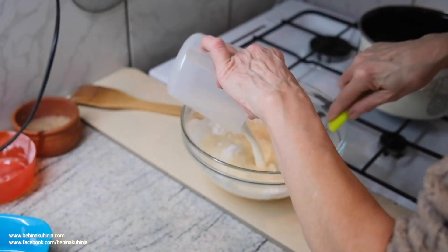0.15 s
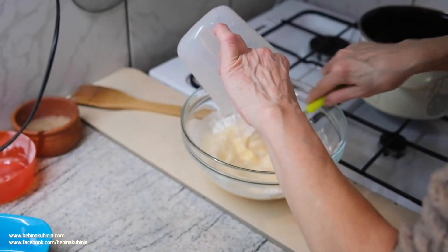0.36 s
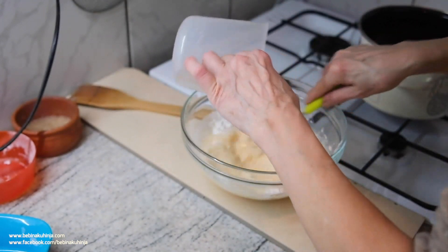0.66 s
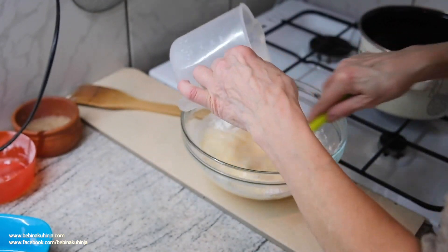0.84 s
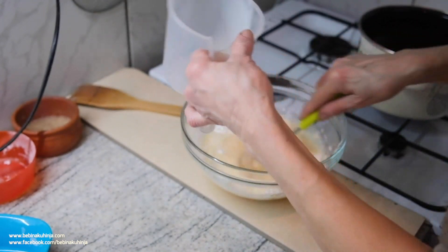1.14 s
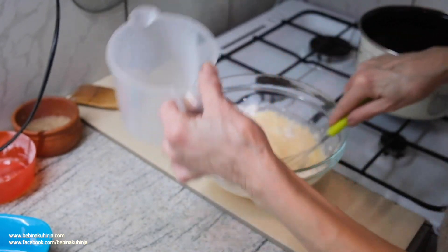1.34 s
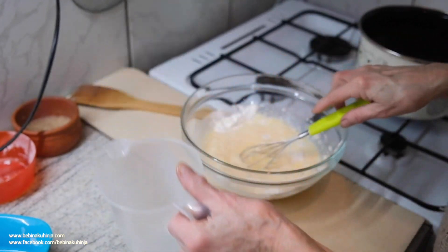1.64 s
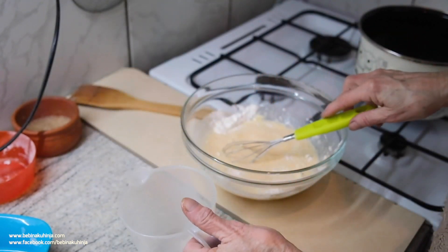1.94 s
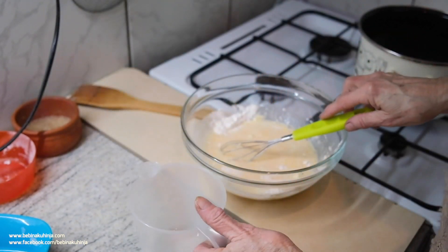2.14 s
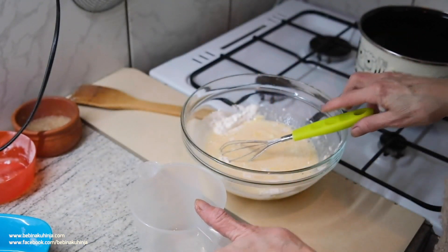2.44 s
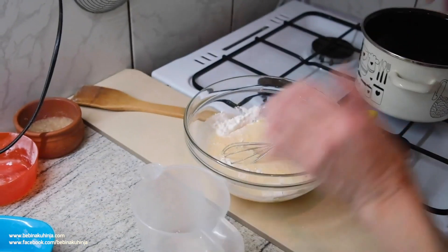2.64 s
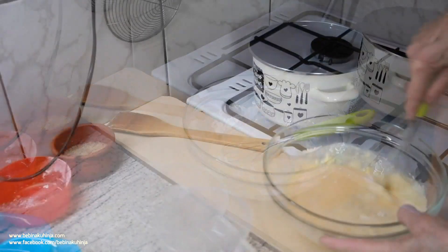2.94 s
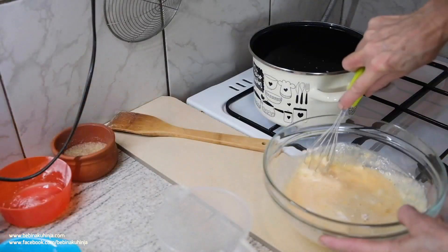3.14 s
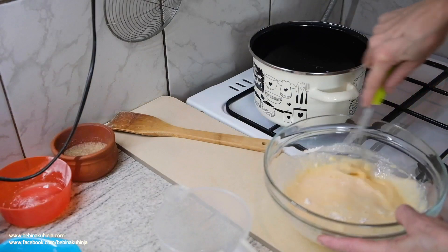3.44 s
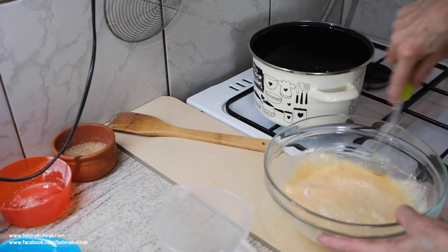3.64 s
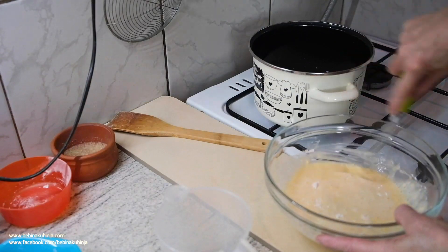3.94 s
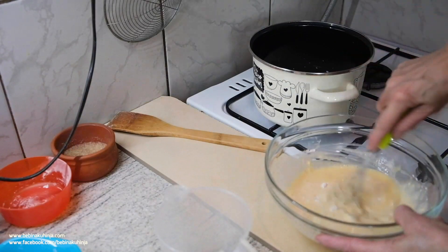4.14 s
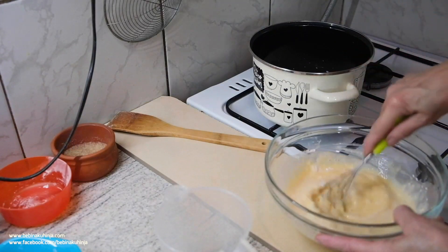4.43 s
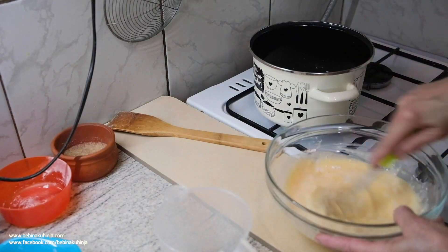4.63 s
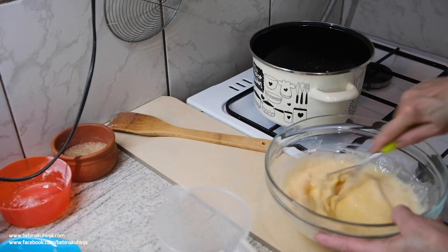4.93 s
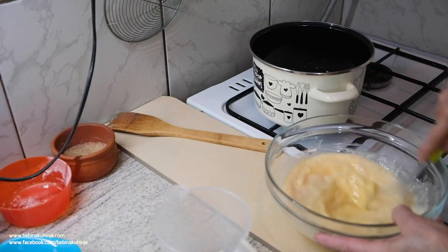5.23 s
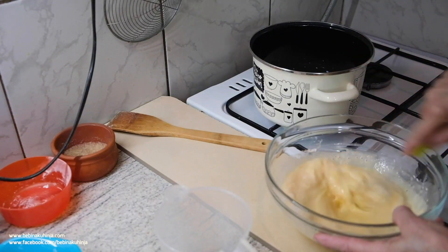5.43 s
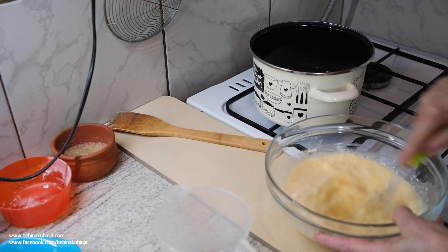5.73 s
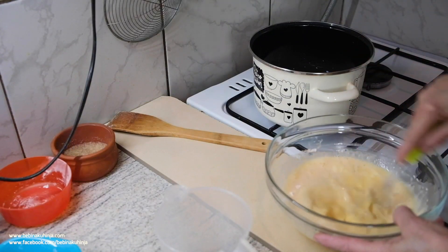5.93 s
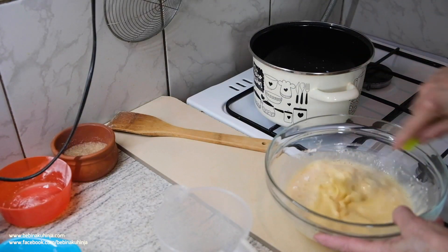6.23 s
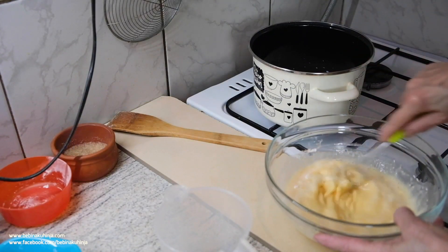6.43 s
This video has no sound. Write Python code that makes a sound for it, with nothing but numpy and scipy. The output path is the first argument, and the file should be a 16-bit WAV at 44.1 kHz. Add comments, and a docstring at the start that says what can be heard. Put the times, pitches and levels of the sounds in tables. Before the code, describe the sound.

A wire whisk ticks unevenly against a glass bowl of sticky batter. Around two seconds in, a plastic jug clinks the rim and is set down with a few hollow knocks. The whisking then speeds into a steady beat of scrapes, ticks and faint squelches, the bowl thudding on a wooden board. The small kitchen has a low hum and hiss, and puffs of air rumble on the close microphone.

```python
"""Whisking batter in a glass bowl

A wire whisk ticks and scrapes through sticky batter in a small kitchen; a plastic jug touches the
glass and is set down. As the beating speeds up, the bowl thuds on its wooden board. Under it sit a low
hum and a hiss, and air stirred by the arms buffets the two microphone ports, the left one most."""
import sys
import numpy as np
from scipy import signal
from scipy.fft import rfft, irfft, next_fast_len
from scipy.io import wavfile
from scipy.ndimage import uniform_filter1d, map_coordinates

SR = 44100
rng = np.random.default_rng(int(sys.argv[2]) if len(sys.argv) > 2 else 0)


def wav_out(sig):
    """Save sig, one row per channel (or a flat mono array), as 16-bit PCM at SR to the path in sys.argv[1]."""
    wavfile.write(sys.argv[1], SR, np.round(np.clip(np.atleast_2d(sig).T, -1, 1) * 32767).astype(np.int16))


N = 289957
T = np.arange(N) / SR

# How hard the whisk works. Each row: time in seconds, effort in dB.
EFFORT = [(0, -4.5), (.1, 3.5), (.45, -0.5), (1.3, -1), (1.6, -6.5), (2.7, -8), (3, -0.5), (4.1, 3.5),
          (4.5, 8.5), (5.5, 12.5), (6.57, 10)]
# The fader ride on the stirred air. Each row: time in seconds, level in dB.
DRAUGHT_RIDE = [(0, -14.5), (.5, -28), (1.0, -26), (1.34, -14), (1.65, -26), (1.85, -17), (2.1, -14.5),
                (2.5, -25), (2.8, -19), (3.6, -22), (4.6, -13.5), (5.3, -17), (5.7, -13.5), (6.25, -13),
                (6.45, -28.5), (6.57, -22)]
# Strong puffs of air. Each row: centre in seconds, peak at the left port in dB.
EDDIES = [(0.141, -20), (0.459, -12), (0.746, -10.5), (1.317, -8.5), (1.41, -11.5), (2.126, -6),
          (3.378, -8.5), (3.966, -11.5), (4.234, -12), (4.32, -5), (4.457, -11.5), (4.604, -6),
          (4.814, -14.5), (4.94, -15), (5.09, -6.5), (5.471, 1.5), (5.914, -6), (6.11, -0.5), (6.161, -16),
          (6.294, -7)]
# EQ curves for the noise layers. Each row: frequency in Hz, level in dB.
AIR_EQ = [(1.8, -66), (3.0, -2), (16, 7), (27, -6), (41, -13.5), (82, -25.5), (122, -36.5), (151, -38),
          (200, -42), (260, -78), (440, -120)]
MURMUR_EQ = [(82, -21), (140, -3), (183, -16), (259, -3.5), (345, -10), (567, -15.5), (699, -17.5),
             (904, -10), (1150, -29.5), (1500, -50), (1950, -32), (3300, -120)]
SHUDDER_EQ = [(150, -29), (200, -12), (270, -8), (370, -5.5), (500, -8.5), (650, -16), (900, -12.5),
              (1200, -15.5), (2000, -17), (3300, -120)]
QUIET_HISS_EQ = [(590, -39), (1000, -3), (1650, 2), (1830, 6), (3170, -3.5), (6250, 3.5), (7440, 0.5),
                 (11900, 4.5), (15200, -12), (16300, -13)]
BUSY_HISS_EQ = [(590, -43), (1000, 0), (1590, 4.5), (1940, 8), (2600, -13), (3300, 0), (4200, -3),
                (4720, 4.5), (5490, 2.5), (10700, -3), (14500, -3), (16300, -48)]
WIRE_EQ = [(290, -82), (500, 7), (752, 16), (992, 6.5), (1490, 6), (2240, -3.5), (2750, -1), (3320, 0),
           (5950, 0.5), (12700, -4.5), (15100, -16), (16300, -31)]
# Ridges in the busy hiss. Each row: centre in Hz, width in Hz, lift in dB.
HISS_RIDGES = [(1260, 80, 4.5), (1868, 42, 9), (2037, 34, 10.5), (4640, 220, 6.5), (6960, 210, 12),
               (9300, 720, 8.5), (10800, 540, 9), (14700, 400, 0)]
# Wire hits glass. Each row: start in seconds, level in dB, pitch in Hz, crack against ring in dB.
WIRE_TICKS = [(0.0114, -31.5, 4470, 8), (0.047, -29, 3130, 6), (0.066, -24, 4900, 1),
              (0.0838, -3.5, 5320, -15), (0.0977, -14, 5700, -9), (0.107, -11, 4600, -23),
              (0.1126, -15.5, 5810, -6), (0.119, -3.5, 5330, -15.5), (0.229, -23, 5160, -5.5),
              (0.286, -29, 5500, 0), (0.303, -19, 4840, 0), (0.349, -30, 4870, -8), (0.377, -30, 5140, -2),
              (0.386, -27, 9250, 2), (0.4, -31, 5500, -7), (0.42, -33, 2260, -2), (0.452, -24.5, 5460, -11),
              (0.498, -32.5, 9150, 2.5), (0.6374, -15.5, 6100, -4), (0.6637, -29.5, 6260, 8.5),
              (0.93, -23.5, 1910, -25), (0.93, -21, 4670, -4), (0.9684, -27.5, 3930, 2.5),
              (1.015, -20.5, 4770, -1.5), (1.082, -38.5, 2210, 8), (1.216, -28, 6000, -5),
              (1.2152, -38, 2000, 8), (1.2437, -26, 2240, 3), (1.803, -10.5, 3430, -11),
              (1.864, -27.5, 5800, 1), (1.993, -10, 4750, -34), (1.996, -12.5, 2200, -3),
              (2.039, -22.5, 2330, 2), (2.04, -17, 4800, -27), (2.0578, -27.5, 2170, 5),
              (2.2232, -24.5, 3630, -3), (2.663, -39, 1980, 4), (3.1031, -29.5, 2150, 1),
              (3.128, -19, 7650, 2.5), (3.43, -24.5, 2630, -21), (3.5538, -32, 1970, 7),
              (3.597, -36, 2040, 9), (3.63, -30, 3320, 16.5), (3.9933, -14, 4470, -1.5),
              (4.077, -26.5, 2720, 3), (4.148, -15, 5370, -3.5), (4.1935, -25.5, 2640, 0),
              (4.21, -30, 2720, -10), (4.2233, -23.5, 2910, 2), (4.452, -29, 3940, -12),
              (4.4866, -15.5, 4000, -17), (4.5662, -16, 6000, 0), (4.568, -23.5, 3930, 0),
              (4.635, -20.5, 5230, -3), (4.7175, -29, 1690, 1), (4.7771, -20.5, 4460, 0),
              (4.786, -26.5, 2980, 4), (4.854, -33, 3150, 0), (4.8884, -22.5, 3280, 8),
              (4.906, -21, 5300, -3), (4.924, -20, 5470, -12), (4.966, -13.5, 6970, -4),
              (4.968, -23.5, 3030, -3), (5.035, -24.5, 4070, 3.5), (5.104, -30.5, 3980, -13),
              (5.181, -25.5, 2890, 8.5), (5.183, -21, 5060, 6), (5.208, -21, 4400, -17),
              (5.246, -24, 4070, 0), (5.36, -24, 3880, -12), (5.386, -26.5, 4140, 4),
              (5.413, -17, 7200, -4), (5.434, -14, 5460, -7), (5.5511, -20.5, 2756, 2),
              (5.601, -16.5, 5100, -3.5), (5.639, -31, 4630, -12), (5.651, -16, 10000, -12),
              (5.687, -17.5, 2800, 2.5), (5.6875, -15, 5300, -15), (5.696, -13, 5560, -8),
              (5.716, -23, 3870, 2), (5.758, -11, 4670, -2), (5.855, -15, 4750, 5),
              (5.889, -11.5, 5320, 0.5), (5.927, -20, 3940, 3.5), (6.008, -13.5, 3130, -1),
              (6.02, -20, 4280, -10), (6.046, -20, 3180, 6), (6.0924, -28, 2920, 3),
              (6.119, -23.5, 7500, 5), (6.153, -18, 7800, 0), (6.154, -23.5, 2800, -6),
              (6.23, -32, 1850, 13), (6.296, -13.5, 3180, 1), (6.307, -26, 4400, -13),
              (6.325, -19, 5700, -14), (6.33, -10.5, 5600, -9), (6.3928, -23, 3550, -1),
              (6.4384, -25, 7100, 5), (6.4979, -14, 4570, 2.5), (6.504, -22, 1880, -15),
              (6.524, -23, 8400, 3.5)]
# Bowl or jug jolts the board outside the fast beats. Each row: start in seconds, level in dB.
JOLTS = [(0.045, -35.5), (0.665, -50.5), (1.243, -43.5), (1.801, -36.5), (1.841, -38.5), (1.992, -24),
         (2.037, -49), (2.058, -27), (2.15, -32.5), (2.222, -26.5), (2.834, -37)]
# The fast beats. Each row: thud time in seconds, levels in dB of thud, sweep in and sweep back,
# then the back sweep's delay in seconds, extra treble in dB and half length in seconds.
BEATS = [(3.293, -29.5, -62, -50, 0.13, -8, 0.022), (3.665, -37.5, -63, -58, 0.076, -15, 0.017),
         (3.882, -25, -58, -69, 0.11, 0, .014), (4.287, -29.5, -53, -44, 0.11, -5, 0.013),
         (4.508, -25, -40.5, -38, 0.13, -5, 0.011), (4.745, -22, -41.5, -37, .12, -3, 0.013),
         (4.977, -21.5, -40, -47.5, .1, 5, 0.023), (5.217, -23, -39, -57, 0.1, 7, 0.048),
         (5.441, -21.5, -39.5, -37, 0.11, -9, 0.019), (5.662, -22.5, -33.5, -38.5, 0.09, -1, 0.02),
         (5.863, -25.5, -35, -34, 0.079, -2, 0.012), (6.078, -41, -54, -42.5, 0.056, 3, 0.023),
         (6.266, -23.5, -38.5, -40, 0.079, -6, 0.016), (6.471, -23, -36, -45, 0.087, -9, 0.023)]
# Modes of the board and of the vessel's air. Each row: pitch in Hz, level in dB, t60 in seconds.
BOARD_MODES = [(118.7, -11.5, 0.55), (271.6, -9, 0.17), (330.5, 2, 0.028), (347, 7.5, 0.034),
               (405.3, -9.5, 0.24), (785, -1, 0.062), (1420, 9.5, 0.0064)]
HOLLOW_MODES = [(710, -10, 0.44), (868, -7.5, 0.14)]
# Knocks on bowl or jug. Each row: start in seconds, level in dB, pitch in Hz, hollow ring in dB.
DULL_TAPS = [(0.08, -38, 850, 7), (0.235, -46.5, 860, -12), (0.301, -39.5, 883, -22),
             (0.665, -36.5, 866, 7), (0.931, -42.5, 820, -20), (1.017, -41.5, 875, -6),
             (1.243, -41, 533, -16), (1.994, -17.5, 762, -19), (2.039, -21.5, 777, 5),
             (2.058, -30.5, 780, 12), (2.073, -37, 850, 11), (2.135, -53, 860, 18), (2.166, -41.5, 863, 14),
             (2.196, -37, 780, -18), (2.229, -23, 733, -4.5), (3.102, -42, 940, 15),
             (3.434, -35.5, 840, -24), (3.884, -34, 782, -5), (4.15, -33.5, 833, -24),
             (4.568, -32.5, 810, -21), (4.721, -41, 750, -15), (4.888, -30, 777, -12),
             (4.97, -26.5, 800, -14), (5.485, -39, 1020, -25), (5.662, -32, 755, -24),
             (5.696, -27.5, 930, -11), (5.785, -37, 1260, -25), (5.936, -25, 810, -28),
             (5.937, -28, 1090, -25), (5.963, -42, 730, -20), (6.499, -20, 793, -35)]
# Lone scrapes. Each row: centre in seconds, level in dB, half length in seconds, treble tilt in dB.
SCRAPES = [(0.102, -48.5, 0.03, -4), (0.402, -49, 0.024, 3), (0.678, -40.5, 0.005, -5.5),
           (0.87, -55.5, 0.006, 12), (0.975, -48, 0.016, 10), (1.02, -47, 0.0081, -1),
           (1.242, -39.5, 0.0083, 8), (1.405, -48, 0.0063, -4), (1.484, -56, 0.038, -1),
           (1.675, -57, 0.0053, -10), (1.968, -57.5, 0.058, -16), (2.182, -50, 0.021, -4),
           (2.584, -56, 0.0091, 17), (2.67, -54, 0.018, 2), (2.84, -64, 0.072, -21.5),
           (3.057, -46, 0.006, 7), (4.15, -38, 0.0052, -8), (4.216, -42, 0.029, 0),
           (4.454, -48, 0.0099, -9), (4.728, -48, 0.0067, -10), (6.037, -41, 0.016, 6)]
# The rim's modes, mostly close pairs that beat. Each entry: pitch in Hz.
RIM_HZ = [1249, 1257, 2258, 2263.4, 3465, 3469.3, 4855, 4861, 6412, 7300]
# How those modes ring. Each row: level in dB, t60 in seconds.
RIM_RING = [(3, .22), (-4, 0.8), (-10.5, 0.6), (-12.5, 1.2), (-9.5, 0.11), (-27, 1.0), (-22, .7), (-23, .9),
            (-24, 0.25), (-23, .05)]
# Touches on the rim. Each row: start in seconds, level in dB, time of damping in seconds,
# loss in dB per octave away from 3470 Hz.
RIM_TOUCHES = [(1.8025, -24, 1.994, 0), (3.631, -33, 3.68, 30), (3.8, -35, 3.96, 40),
               (3.853, -36, 3.96, 40), (3.995, -32, 4.04, 40)]
# Rumble after a jolt. Each row: start in seconds, level in dB, t60 in seconds.
AFTERSHAKES = [(1.8, -36.5, 0.91), (1.995, -45, 0.41), (2.8, -44, 0.54)]
# The kitchen's reverb. Each row: frequency in Hz, t60 in seconds.
ROOM_DECAY = [(200, 0.31), (2000, 0.057), (10000, 0.11)]

# Each FOLLOWS is dB gained per dB of effort.
HUM_FOLLOWS, MURMUR_FOLLOWS, HISS_FOLLOWS, BOUNCE_FOLLOWS, TILT_FOLLOWS = 0.65, 0.52, 0.11, 0.79, 0.15
SPEED_UP_S = (2.72, 3.07)  # the lead-in to the fast beating


def amp(db):
    """Decibels to gain."""
    return 10 ** (np.asarray(db) / 20)


def unit(x):
    """Scaled to rms 1."""
    return x / np.sqrt(np.mean(x ** 2) + 1e-20)


def along(points, hz):
    """Reads a curve on a log frequency axis."""
    f, v = np.transpose(points)
    return np.interp(np.log(hz + 1), np.log(f + 1), v)


def effort_at(s):
    """Whisking effort in dB at s seconds."""
    return np.interp(s, *np.transpose(EFFORT))


def wobble(rate):
    """A smooth random curve, rate knots a second."""
    return map_coordinates(rng.standard_normal(int(N * rate / SR) + 4), [T * rate])


def filtered(x, response):
    """Applies a frequency response."""
    m = next_fast_len(N + SR // 2)
    return irfft(rfft(x, m) * response(np.fft.rfftfreq(m, 1 / SR)), m)[..., :N]


def stereo_noise(response, side_db):
    """Coloured mid/side noise of rms 1."""
    mid, side = filtered(rng.standard_normal((2, N)), response) * amp([[0], [side_db]])
    return unit(np.array([mid + side, mid - side]))


def eq_noise(eq, side_db):
    """Stereo noise through an EQ curve."""
    return stereo_noise(lambda hz: amp(along(eq, hz)), side_db)


def ring(modes, t, spread_db=0):
    """Damped sines, their levels scattered by spread_db."""
    return sum(amp(db + spread_db * rng.standard_normal() - 60 * t / t60) * np.sin(2 * np.pi * hz * t)
               for hz, db, t60 in modes)


def grains(count, centre_hz, octaves, cycles, spike_db, rise=0):
    """A cloud of tiny damped sines at random times, pitches and sizes; rise bends them upward."""
    when, size, life, u, v = rng.random((count, 5)).T[:, :, None]
    bell_curve = np.sqrt(-2 * np.log(u + 1e-9)) * np.cos(2 * np.pi * v)
    hz = centre_hz * 2 ** (octaves * bell_curve).clip(-2.2, 1.6)
    t = T[:400]
    decay = np.exp(-t * hz / (cycles * (.3 + life))) * (1 - t / t[-1])
    tone = np.sin(2 * np.pi * hz * t * (1 + rise * t / t[-1] / 2))
    wave = amp(-spike_db * np.log(size + .01)) * decay * tone
    at = (when * N).astype(int) + np.arange(400)
    return unit(np.bincount(at.ravel(), wave.ravel(), N)[:N])


def add(track, s, sound):
    """Mixes a sound into the track at s seconds."""
    part = track[round(s * SR):][:len(sound)]
    part += sound[:len(part)]


def all_thuds():
    """Time and level of every jolt of the board."""
    return JOLTS + [(s, db) for s, db, *_ in BEATS]


def draught():
    """Stirred air rumbles on the ports, mostly the left; each eddy sucks, then pushes."""
    level_db = np.interp(T, *np.transpose(DRAUGHT_RIDE))
    lumps = amp(0.48 * np.array([wobble(16), wobble(15)]))
    air = unit(lumps * eq_noise(AIR_EQ, side_db=1.5))
    eddies = np.zeros(N)
    for s, db in EDDIES:
        half_s = max(.008 - .0004 * db, .004)  # weaker eddies last longer
        u = (T[:SR // 5] - .1) / half_s
        add(eddies, s - .1, amp(db) * u * np.exp((1 - u * u) / 2))
    return amp(level_db) * air * amp([[0], [-8.5]]) + eddies * amp([[0], [-19]])


def hum(centre_hz=121.5, width_hz=11.5, rise_s=0.018):
    """A wavering band of low noise that rides the effort and swells at each thud."""
    band = stereo_noise(lambda hz: 1 / (1 + ((hz - centre_hz) / width_hz * 2) ** 2), side_db=-7)
    gain = amp(-55 + HUM_FOLLOWS * effort_at(T))
    for s, db in all_thuds():
        held_db = -6 * (s > SPEED_UP_S[1])  # a hand holds the bowl in the fast beats
        u = np.clip(T - s, 0, None) / rise_s
        gain += amp(db - 11.5 + held_db) * u * np.exp(1 - u)
    return gain * band * amp([[1.5], [-1.5]])


def murmur():
    """A low, restless bed that rises with the effort."""
    return amp(-57 + MURMUR_FOLLOWS * effort_at(T) + 2 * wobble(17)) * eq_noise(MURMUR_EQ, side_db=-7.5)


def hiss():
    """A faint hiss crossfades to a louder, ridged one as the beating speeds up."""
    def ridged(eq, ridges):
        return lambda hz: amp(along(eq, hz) + sum(db * np.exp(-((hz - centre) / width) ** 2)
                                                  for centre, width, db in ridges))
    busy = stereo_noise(ridged(BUSY_HISS_EQ, HISS_RIDGES), side_db=-6.5)
    quiet = stereo_noise(ridged(QUIET_HISS_EQ, [(6350, 200, 4.4)]), side_db=-6)
    fade = np.interp(T, SPEED_UP_S, [0, np.pi / 2])
    blend = amp(-57.5) * np.cos(fade) * quiet + amp(-50.5) * np.sin(fade) * busy
    return amp(HISS_FOLLOWS * effort_at(T) + 0.067 * wobble(14)) * blend


def batter():
    """Sticky batter pops, bubbles and squelches in loose clumps; the hollow bowl patters back."""
    pops = grains(count=7000, centre_hz=3300, octaves=.8, cycles=10, spike_db=2.8)
    bubbles = grains(count=1200, centre_hz=3000, octaves=.6, cycles=15, spike_db=3, rise=.25)
    squelches = grains(count=1500, centre_hz=850, octaves=.4, cycles=2.5, spike_db=2.5)
    patter = grains(count=500, centre_hz=850, octaves=.07, cycles=7, spike_db=3)
    fizz = grains(count=6000, centre_hz=8500, octaves=.4, cycles=9, spike_db=2.5)
    clumps_db = 3 * wobble(22)
    blend = pops + amp(-8.5) * fizz + amp(-1.5) * bubbles + amp(-3) * squelches + amp(-4) * patter
    return amp(-65 + effort_at(T) + clumps_db) * blend


def stray_ticks(count):
    """Rows for weak chance contacts, denser and louder as the effort grows."""
    odds = np.cumsum(amp(effort_at(T)))
    when, size, pitch = rng.random((count, 3)).T
    s = np.interp(when, odds / odds[-1], T)
    db = -49 + 0.22 * effort_at(s) + 8 * (size - .5)
    hz = 3400 * 2 ** (1.8 * (pitch - .5))
    return list(zip(s, db, hz, np.full(count, -6.5)))


def wire_ticks(spread_oct=0.642, ring_cycles=32, near_cycles=60, crack_t60=.028):
    """Wire strikes glass: one short mode, five wire modes near it, a coloured crack and a bright snap."""
    out, t = np.zeros(N), T[:2048]
    grid = np.fft.rfftfreq(len(t), 1 / SR) + 1
    attack = 1 - np.exp(-t / 0.0011)
    for s, db, hz, crack_db in WIRE_TICKS + stray_ticks(count=26):
        band_db = along(WIRE_EQ, grid) - along(WIRE_EQ, hz) - 1.33 * (np.log2(grid / hz) / spread_oct) ** 2
        crack = unit(irfft(rfft(rng.standard_normal(len(t))) * amp(band_db)))
        crack *= amp(crack_db - 4.5 - 60 * t / crack_t60)
        near_hz = np.clip(hz * 2 ** (spread_oct * rng.standard_normal(5)), 900, 11000)
        near = [(f, crack_db - 9 - 4 * abs(np.log2(f / hz)), near_cycles / f) for f in near_hz]
        ping = ring([(hz, 6, ring_cycles / hz)] + near, t)
        snap_db = crack_db - 25 + 24 * np.log2(hz / 4000)  # duller ticks snap less
        snap = amp(snap_db - 60 * t / 0.0023) * rng.standard_normal(len(t))
        add(out, s, amp(db - 8.5) * (attack * (ping + crack) + snap))
    return out


def soft_attack(t):
    """A soft contact starts gently."""
    return 1 - np.exp(-t / 0.00098)


def board_thuds(detune=0.026, bounce_s=.019):
    """Each landing rings the board from a new spot and bounces once, harder with more effort."""
    out, t = np.zeros(N), T[:SR // 3]
    for s, db in all_thuds():
        modes = [(hz * (1 + detune * rng.standard_normal()), level, t60) for hz, level, t60 in BOARD_MODES]
        add(out, s, amp(db - 5.5) * soft_attack(t) * ring(modes, t, spread_db=2))
        bounce_db = db - 26 + BOUNCE_FOLLOWS * effort_at(s)
        add(out, s + bounce_s, amp(bounce_db) * soft_attack(t) * ring(modes, t, spread_db=7))
    return out


def dull_taps():
    """A short knock on bowl or jug wakes the air inside, most in the mode nearest its pitch."""
    out, t = np.zeros(N), T[:SR // 3]
    for s, db, hz, hollow_db in DULL_TAPS:
        modes = [(f, level - 7.5 - 49 * abs(np.log2(f / hz)), t60) for f, level, t60 in HOLLOW_MODES]
        flutter_db = 4 * unit(uniform_filter1d(rng.standard_normal(len(t)), size=400))
        blow = ring([(hz, 2, .026), (hz * 2.67, -15, .02)], t, spread_db=1)
        hollow = amp(hollow_db + flutter_db) * ring(modes, t, spread_db=1)
        add(out, s, amp(db + 4) * soft_attack(t) * (blow + hollow))
    return out


def wire_scrapes(lead_s=0.012, sweep_half_s=0.016, crossover_hz=4200):
    """Wires slip along the wall: grit and wet pops swell with each sweep, tilted dull or bright."""
    sweeps = []
    for s, _, in_db, back_db, delay_s, treble_db, back_half_s in BEATS:
        tilt_db = 5 + TILT_FOLLOWS * effort_at(s)
        sweeps.append((s - lead_s, in_db, sweep_half_s, tilt_db))
        sweeps.append((s + delay_s, back_db, back_half_s, tilt_db + treble_db))
    s, db, half_s, tilt_db = np.transpose(SCRAPES + sweeps)[:, :, None]
    swell = np.exp(-.5 * ((T[::32] - s) / np.clip(half_s, .003, .08)) ** 2)
    low_gain, high_gain = [np.repeat((amp(db + lean_db) * swell).sum(axis=0), 32)[:N]
                           for lean_db in (-tilt_db / 2, tilt_db / 2)]
    grit = amp(3.5 * wobble(400) + 2 * wobble(70))
    slips = unit(grit * eq_noise(WIRE_EQ, side_db=-13))
    slips += grains(count=4500, centre_hz=4300, octaves=.8, cycles=8, spike_db=2.8)
    treble = filtered(slips, lambda hz: 1 / (1 + (crossover_hz / (hz + 1)) ** 6))
    return amp(-4.5) * (low_gain * (slips - treble) + high_gain * treble)


def shudder():
    """Board and bowl rumble on after a jolt and die away."""
    gain = sum(amp(db - 60 * np.abs(T - s) / t60) * (T >= s) for s, db, t60 in AFTERSHAKES)
    return gain * amp(0.58 * wobble(31.1)) * eq_noise(SHUDDER_EQ, side_db=-8.5)


def rim_clinks():
    """The glass rim rings, fluttering against what touches it, until it is damped."""
    out, t = np.zeros(N), T[:SR // 2]
    attack = 1 - np.exp(-t / .003)
    for s, db, stop_s, loss_db in RIM_TOUCHES:
        modes = [(hz, level - loss_db * abs(np.log2(hz / 3470)), t60)
                 for hz, (level, t60) in zip(RIM_HZ, RIM_RING)]
        damping_db = 60 * np.clip(t - stop_s + s, 0, None) / .02
        add(out, s, amp(db - damping_db) * attack * ring(modes, t))
    return out * amp(1.5 * wobble(70) + 2 * wobble(300))


def housing_reflection(x, delay_s=0.000693):
    """The microphone housing throws back a late, bright copy, opposite in polarity at the two ports."""
    late = filtered(x, lambda hz: amp(-26) * hz / (hz + 1500) * np.exp(-2j * np.pi * hz * delay_s))
    return late * [[1], [-1]]


def kitchen(x):
    """A tight room whose lows ring longest, with a fresh noise tail every third of a second."""
    out, step, predelay = np.zeros((2, N + SR)), SR // 3, 200
    for start in range(0, N, step):
        hz, t, spectrum = signal.stft(rng.standard_normal((2, SR // 4)), SR, nperseg=256)
        decay = amp(-60 * t / along(ROOM_DECAY, hz)[:, None])
        tail = signal.istft(spectrum * decay, SR, nperseg=256)[1]
        wet = signal.fftconvolve(x[None, start:start + step], tail / np.linalg.norm(tail[0]), axes=1)
        at = start + predelay
        out[:, at:at + wet.shape[1]] += wet
    return out[:, :N]


def scene():
    """The mix: the bowl a little to the right, the room around it, the noise beds underneath."""
    knocks = board_thuds() + dull_taps()
    crackle = wire_ticks() + batter()
    scrapes, glass = wire_scrapes(), rim_clinks()
    direct = knocks * amp([[-.6], [.6]]) + (crackle + scrapes + glass) * amp([[-.4], [.4]])
    direct += housing_reflection(crackle + amp(9) * glass)
    room = kitchen(amp(-5) * knocks + amp(-5.5) * (crackle + scrapes[0]) + amp(-6) * glass)
    return direct + room + hum() + murmur() + shudder() + hiss() + draught()


def record(dry, top_hz=16400):
    """The strongest gust clips; a brick-wall low-pass trims the top."""
    return filtered(np.clip(dry, -1, 1), lambda hz: hz < top_hz)


dry = scene()
out = record(dry)
wav_out(out)
```